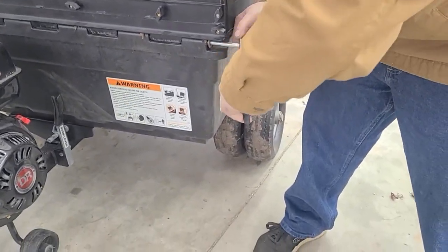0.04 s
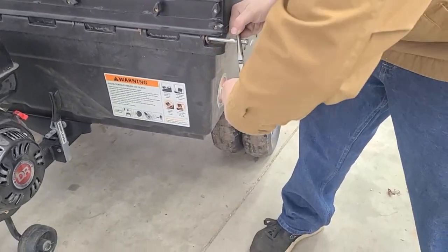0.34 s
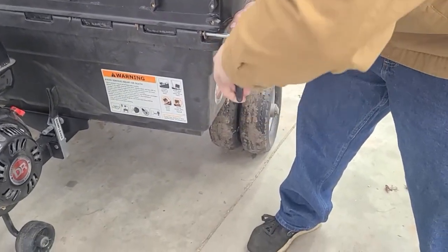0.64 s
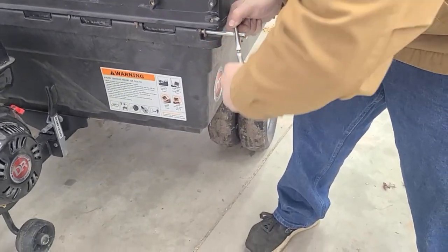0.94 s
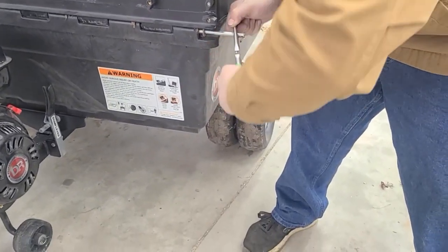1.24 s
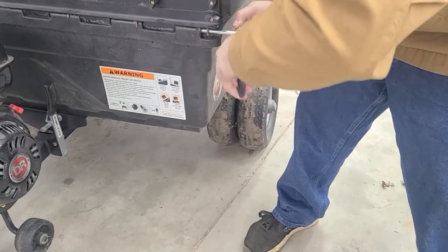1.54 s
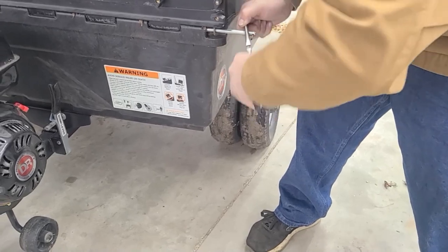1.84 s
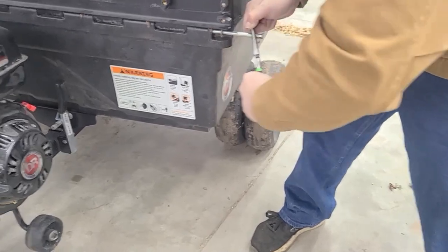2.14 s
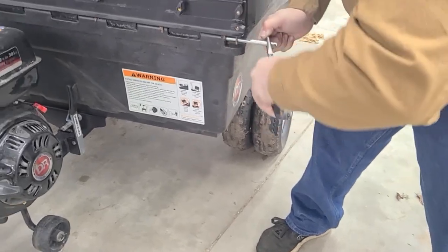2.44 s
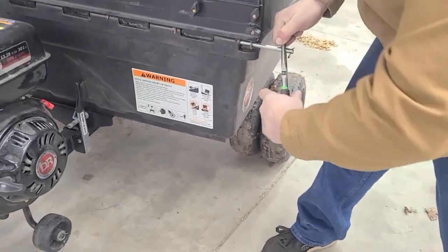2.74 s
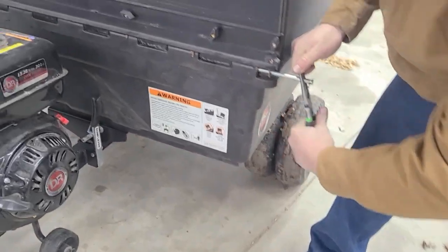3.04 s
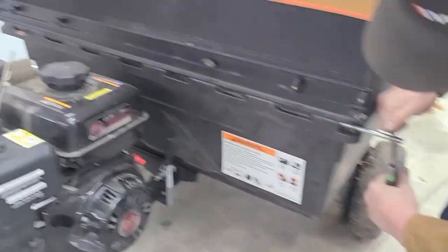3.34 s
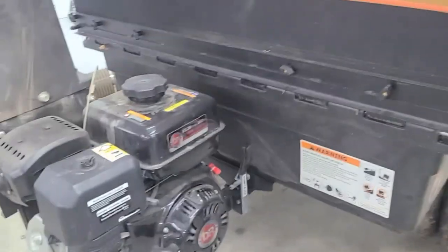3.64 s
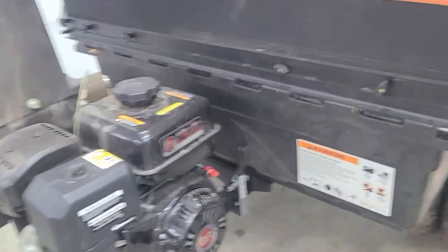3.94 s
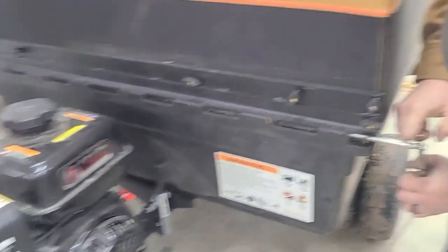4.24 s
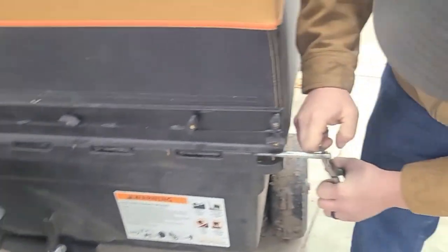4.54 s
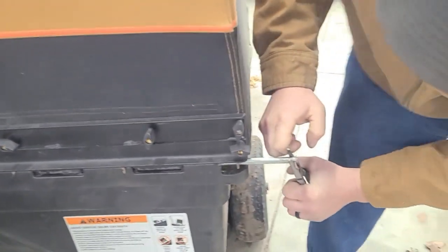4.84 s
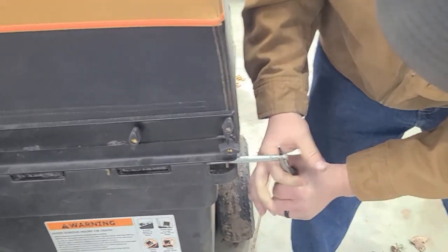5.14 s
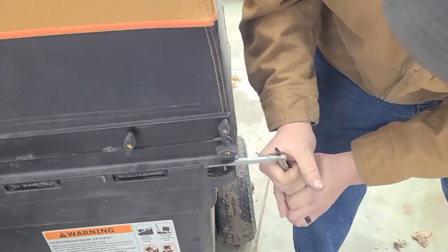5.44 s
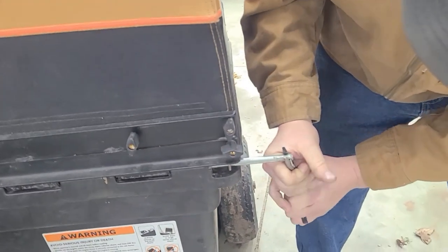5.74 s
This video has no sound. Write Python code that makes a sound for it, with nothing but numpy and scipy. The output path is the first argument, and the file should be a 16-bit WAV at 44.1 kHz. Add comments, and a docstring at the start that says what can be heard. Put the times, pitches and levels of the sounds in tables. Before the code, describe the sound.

Pliers twist a steel rod in a hinge with faint rubbing and ticks, then a booming clack, a knock and a bright metallic ring.

```python
"""A humming garage: pliers twist a steel rod to and fro through the hinge of a machine's hopper.
The rod rubs softly in the hinge and the jaws tick on it. It jerks forward with a clack and the hopper
wall booms; it knocks once more, then steel strikes steel and rings brightly.
Canvas sleeves swish as the hands change their grip."""
import sys
import numpy as np
from scipy import signal
from scipy.fft import rfft, irfft, next_fast_len
from scipy.io import wavfile
from scipy.ndimage import map_coordinates

SR = 44100
rng = np.random.default_rng(int(sys.argv[2]) if len(sys.argv) > 2 else 0)


def to_wav(sig):
    """Store sig (one row per channel, or 1-D mono) as 16-bit WAV at the path in sys.argv[1].

    Samples outside -1..1 are clipped; the rate is SR.
    """
    pcm = np.clip(np.atleast_2d(sig), -1, 1) * 32767
    pcm = np.round(pcm).astype(np.int16)
    wavfile.write(sys.argv[1], SR, pcm.T)  # frames by channels


N = 255474


def rubbing():
    """Each twist rubs into the hopper's many resonances; shoved lengthwise, the rod scrapes harder."""
    # twists of the rod: peak speed t/s, level/dB
    twists = [(0.299, -60.5), (.6, -53.5), (.84, -55.5), (1.058, -54.5), (1.281, -56), (1.499, -54.5),
              (1.7, -55), (1.915, -55.5), (2.134, -56), (2.349, -56.5), (2.59, -54)]
    # lengthwise shoves: peak speed t/s, level/dB, rise/s, fall/s, grit offset/dB
    shoves = [(2.744, -49, 0.043, .11, -1), (2.821, -35, 0.01, 0.019, -10), (3.229, -57, 0.022, 0.031, -29),
              (3.44, -38, .033, .014, -22.5), (3.505, -46, 0.045, .028, -9.5)]
    # friction spectra: f/Hz, level/dB
    rub_spectrum = [(180, -58), (300, -24), (326, -0.5), (461, -12), (756, -2), (1110, -5), (1200, -5),
                    (2170, -8.5), (3870, -19.5), (6570, -29), (15500, -39)]
    scrape_spectrum = [(240, -31), (400, -4), (1120, -3), (1470, 0), (2470, -9.5), (3210, -7.5), (3570, -9),
                       (5230, -23.5), (6680, -19.5), (8030, -28), (15500, -33)]
    grit_spectrum = [(1500, -11), (3000, 4.5), (4500, -2), (7000, -6.5), (9000, -14), (15000, -23)]
    turning = sum(amp(db) * stroke(s, rise_s=0.09, fall_s=0.055) for s, db in twists)
    twist = turning * amp(2 + wobble(56)) * noise(shape(rub_spectrum), grain_db=1, ripple_db=3.5)
    scrape_env, grit_env = np.zeros(N), amp(-11.5) * turning
    for s, db, rise_s, fall_s, grit_db in shoves:
        speed = stroke(s, rise_s, fall_s)
        scrape_env += amp(db) * speed
        grit_env += amp(db + grit_db) * speed
    scrape = scrape_env * noise(shape(scrape_spectrum), grain_db=2, ripple_db=6)
    grit = grit_env * noise(shape(grit_spectrum), grain_db=2)
    return twist * pan(2.8) + (scrape + grit) * amp(wobble(60)) * pan(0.83)


def plier_ticks():
    """The jaws shift on the rod: a bright snap with some body from the hinge."""
    # jaw slips: t/s, level/dB, body offset/dB
    slips = [(0.4742, -40, -6.5), (0.561, -42.5, 2.5), (0.6222, -38.5, 6), (0.7612, -42, 7),
             (0.8169, -45.5, -2), (1.1996, -44.5, -2), (1.272, -51, -9), (1.8248, -43, 2.5),
             (2.0416, -46, 1), (2.4836, -49, 0), (2.7041, -44, -10), (2.8316, -33, 10), (3.4356, -28, 4),
             (3.95, -60.5, 23), (4.645, -31, 3.5), (4.685, -41.5, 5), (4.7352, -45, 8.5)]
    snap_env, body_env = np.zeros((2, 1, N))
    for s, db, body_db in slips:
        add(snap_env, s, amp(db - 7.5) * blow(rise_s=0.00055, t60_s=0.049))
        add(body_env, s, amp(db + body_db - 8.5) * blow(rise_s=0.0016, t60_s=0.077))
    snap = noise(shape([(1500, -24), (4300, 0), (5700, -2.5), (6400, 1.5), (7200, -1.5),
                        (9000, -9), (15000, -12)]))
    body = noise(shape([(200, -27.5), (800, -3), (1600, 2), (3200, -4), (6000, -32), (15000, -36)]))
    return (snap_env * snap + body_env * body) * pan(3.6)


def rod_jolts():
    """The rod breaks loose and fetches up against the hinge with a dry clack."""
    # jolts: t/s, level/dB, rise/s, t60/s, resonance f/Hz, boost/dB, Q
    jolts = [(2.817, -27.5, 0.0033, 0.22, 1900, 5, 3.2), (2.829, -16.5, 0.0047, 0.091, 845, 2.5, 2),
             (3.434, -28.5, 0.0018, 0.035, 1300, -1.5, 2), (3.439, -25, 0.00047, 0.061, 1390, 24, 6.2),
             (3.455, -36.5, .002, 0.24, 380, 25, 3.3)]
    # hinge spectrum: f/Hz, level/dB
    hinge = [(120, -17), (200, -8.5), (315, -3.5), (422, -37.5), (525, 0), (677, -9.5), (1110, 1),
             (1260, -5.5), (2130, -8), (2420, -20.5), (3750, -15.5), (4030, -19.5), (6350, -28.5),
             (8500, -40), (15500, -52.5)]
    out = np.zeros((2, N))
    for s, db, rise_s, t60_s, clack_hz, boost_db, q in jolts:
        clack = noise(lambda hz: along(hinge, hz) + boost_db * hump(hz, clack_hz, q), SR)
        add(out, s, amp(db) * blow(rise_s, t60_s) * clack)
    return out * pan(1.46)


def hopper():
    """The hopper wall booms after a jolt and thuds when leaned on."""
    # wall modes, the strongest two beating: f/Hz, level/dB, t60/s
    wall_modes = [(242, -16.5, 0.61), (278.5, -6, 0.62), (286.9, 4.5, 0.31), (575, -6.5, 0.12),
                  (584, -27, 1), (847, -4.5, 0.11), (1050, -43, 1), (1117, -8, 0.082), (1260, -41, 0.43),
                  (1535, -28, 0.21), (1790, -32, 0.79), (2230, -39, 0.79)]
    # pushes on the wall: t/s, level/dB, rise/s
    pushes = [(2.82, -28.5, 0.015), (2.85, -20.5, 0.011)]
    # dull bumps of hands and body: t/s, level/dB, f/Hz, t60/s
    bumps = [(0.05, -46.5, 170, 0.58), (1.29, -51, 350, 0.39), (2.12, -49.5, 140, 0.29),
             (2.674, -35.5, 80.5, 0.24), (3.449, -38.5, 193, 0.19), (3.551, -44, 176, 0.23),
             (4.653, -39.5, 227, 0.15), (4.678, -43, 360, 0.3), (5.079, -36.5, 174, 0.19)]
    out = np.zeros((2, N))
    for s, db, rise_s in pushes:
        for hz, mode_db, t60_s in wall_modes:
            boom = mode(hz, t60_s, rise_s, scatter=0.27, build_s=0.036, flutter_hz=16)
            add(out, s, amp(db + mode_db) * boom)
    for s, db, centre_hz, t60_s in bumps:
        thud = noise(lambda hz: 40 * np.log10(hump(hz, centre_hz, q=2.2)), SR)
        add(out, s, amp(db) * blow(0.0068, t60_s) * thud)
    return out * pan(0.25)


def steel_ring():
    """Steel strikes steel and rebounds; the close pair of modes near 7 kHz beats."""
    # steel modes: f/Hz, level/dB, t60/s, rise/s, left-right level/dB, left-right phase/rad
    steel_modes = [(1400, -44, .45, .003, -1, .4), (2729, -47, .4, .002, 0, .6),
                   (3892, -23.5, .74, .018, 0, .9), (4646, -41, .42, .002, 0, 1),
                   (5679, -48, .4, .002, 0, 1), (6228, -49, .6, .002, 0, 1),
                   (6955, -17.5, .22, .002, 7, 1.2), (7064, -15, .56, .002, 7, 1.2),
                   (9001, -45, .3, .002, 0, 1.5), (9324, -47, .45, .002, 0, 1.5),
                   (9636, -30, .33, .002, -3, 1.6), (10343, -21.5, .38, .003, 0, 1.8),
                   (11060, -33, .38, .003, 0, 1.8), (12370, -26, .28, .004, -3, 1.2),
                   (13743, -36, .34, .002, 2, 1.4), (14184, -34, .35, .002, 2, 1.4),
                   (14470, -32, .42, .002, 2, 1.2)]
    # cracks of strike and rebound: t/s, level/dB
    clinks = [(4.0795, -22), (4.1077, -28.5)]
    out = np.zeros((2, N))
    strike_s = clinks[0][0]
    for k, (hz, db, t60_s, rise_s, side_db, phase_rad) in enumerate(steel_modes):
        ring = mode(hz, t60_s, rise_s, scatter=0.3, build_s=0.03, flutter_hz=45, phase_rad=phase_rad)
        tilt_db = 0.3 * np.log2(hz / 7000)  # a hard strike favours the upper modes
        polarity = (-1) ** k
        add(out, strike_s, polarity * amp(db + tilt_db) * pan(side_db) * ring)
    out *= standing_waves(strike_s)
    colour = shape([(400, -9.5), (1500, -4), (4000, 1.5), (5500, -1), (7000, 2),
                    (10000, -7.5), (15000, -2)])
    tick_env = amp(4.5) * blow(rise_s=0.00018, t60_s=0.015)
    wash_env = amp(-13) * blow(rise_s=0.0036, t60_s=0.46)
    for s, db in clinks:
        add(out, s, amp(db) * (tick_env + wash_env) * noise(colour, SR, ripple_db=2.5))
    return out


def standing_waves(strike_s):
    """Gain of the ring as the listener moves through it: a growing reflection drifts in and out of step."""
    node_s, node_rate_hz, depth = 4.284, 8.4, 0.8
    build_s, build_db = 0.26, 4.5
    t = np.arange(N) / SR
    built = 1 - np.exp(-np.maximum(t - strike_s, 0) / build_s)
    reflection = depth * built * np.exp(2j * np.pi * node_rate_hz * (t - node_s))
    return amp(build_db * built) * np.abs(1 - reflection)


def sleeves():
    """Canvas brushes on canvas; the fastest part of a swish adds fizz."""
    # swishes: peak speed t/s, level/dB, rise/s, fall/s, fizz offset/dB
    swishes = [(4.454, -49.5, 0.058, 0.031, -7.5), (4.528, -45, 0.06, 0.055, 0),
               (4.68, -57, 0.087, 0.082, -10), (4.847, -42.5, 0.078, 0.032, -10.5),
               (5.42, -75, 0.39, .18, -1.5)]
    # cloth spectra: f/Hz, level/dB
    canvas_spectrum = [(200, -15), (700, -8), (1500, -3), (2200, 0), (3100, 0), (4600, -9.5), (7000, -15.5),
                       (9000, -19.5), (15000, -27.5)]
    fizz_spectrum = [(1800, -10), (3200, 7), (4000, 4.5), (5000, -4), (6900, 2.5), (8500, -9.5),
                     (12500, -3.5), (15500, -8)]
    swish_env, fizz_env = np.zeros((2, N))
    for s, db, rise_s, fall_s, fizz_db in swishes:
        speed = stroke(s, rise_s, fall_s)
        swish_env += amp(db) * speed
        fizz_env += amp(db + fizz_db + 3.5) * speed ** 1.4
    swish = swish_env * noise(shape(canvas_spectrum), grain_db=1, ripple_db=2.5)
    fizz = fizz_env * noise(shape(fizz_spectrum))
    return (swish + fizz) * amp(2.5 + wobble(70)) * pan(0.81)


def garage_echo(x, predelay_s=0.006):
    """Hard walls reflect the sound, the treble dying first."""
    # room decay: f/Hz, t60/s
    decay = [(150, .5), (1000, 0.8), (3500, 0.75), (8000, 0.42), (15000, 0.038)]
    hz, t, spectra = signal.stft(noise(np.zeros_like, SR), SR, nperseg=256)
    fade = np.exp(-np.log(1000) * t / along(decay, hz)[:, None])
    tail = signal.istft(spectra * fade, SR, nperseg=256)[1]
    delayed = np.pad(x.mean(axis=0), (round(predelay_s * SR), 0))
    return signal.fftconvolve(delayed[None], tail / np.linalg.norm(tail[0]), axes=1)[:, :N]


def background():
    """A wavering machine hum over the garage's low rumble and faint hiss."""
    # hum tones: f/Hz, level/dB
    tones = [(60, -49.5), (119, -56), (328, -66.5)]
    # room noise spectrum: f/Hz, level/dB
    air = [(22, -24), (40, -12), (70, -3.5), (110, -5.5), (160, -16), (230, -15), (330, -17.5), (500, -21),
           (800, -25), (1200, -27.5), (2400, -34), (4500, -39.5), (7000, -39), (8600, -48.5), (15800, -49)]
    t = np.arange(N) / SR
    hum = sum(amp(db + 2.5 * wobble(5)) * np.sin(2 * np.pi * hz * t + 0.45 * wobble(4))
              for hz, db in tones)
    rumble = amp(-53.5) * noise(lambda hz: 40 * np.log10(hump(hz, centre_hz=61.8, q=4.6)))
    return (hum + rumble) * pan(-0.77) + amp(-53) * noise(shape(air))


def mode(hz, t60_s, rise_s, scatter, build_s, flutter_hz, phase_rad=0):
    """A ringing mode; as reflections build up, it wavers differently left and right."""
    t = np.arange(SR) / SR
    knots = rng.standard_normal((2, 64)) + 1j * rng.standard_normal((2, 64))
    curves = signal.resample(knots, 512, axis=1)
    echoes = np.array([np.interp(t * flutter_hz, np.arange(512) / 8, curve) for curve in curves])
    share = scatter * (1 - np.exp(-t / build_s))
    direct = np.exp(0.5j * phase_rad * np.array([[1], [-1]]))
    field = (direct + share * echoes) / np.sqrt(1 + 2 * share ** 2)
    return blow(rise_s, t60_s) * np.imag(field * np.exp(2j * np.pi * hz * t))


def noise(colour, size=N, grain_db=0, ripple_db=0):
    """Stereo noise, rms 1, colour(Hz) in dB; grain makes tiny catches, ripple many close resonances."""
    # left-right likeness: f/Hz, correlation
    likeness = [(60, 0.98), (250, 0.87), (500, 0.32), (1000, 0.19), (3000, 0.073), (12000, .15)]
    catches = rng.standard_normal((2, size)) * amp(grain_db * wobble(700, size))
    peaks = signal.resample(rng.standard_normal(512), 4096)

    def mid_side_gains(hz):
        ripple = np.tanh(np.interp(hz, np.linspace(0, SR / 2, len(peaks)), peaks))
        width_rad = np.arccos(np.clip(along(likeness, hz), -1, 1)) / 2
        return amp(colour(hz) + ripple_db * ripple) * [np.cos(width_rad), np.sin(width_rad)]

    mid, side = filtered(catches, mid_side_gains)
    stereo = np.array([mid + side, mid - side])
    return stereo / np.sqrt(np.mean(stereo ** 2) + 1e-20)


def stroke(peak_s, rise_s, fall_s):
    """Envelope of a rubbing movement that speeds up until peak_s, then slows."""
    roundness = 2.7  # 1 pointed, 2 a bell, more is flat-topped
    t = np.arange(N) / SR - peak_s
    return np.exp(-np.abs(t / np.where(t < 0, rise_s, fall_s)) ** roundness)


def blow(rise_s, t60_s):
    """Impact envelope, 1 s long."""
    t = np.arange(SR) / SR
    return (1 - np.exp(-t / rise_s)) * np.exp(-np.log(1000) * t / t60_s)


def wobble(rate_hz, size=N):
    """Smooth random curve."""
    knots = rng.standard_normal(int(size * rate_hz / SR) + 4)
    return map_coordinates(knots, [np.arange(size) * rate_hz / SR])


def amp(db):
    """Decibels to gain."""
    return 10 ** (np.asarray(db) / 20)


def pan(db):
    """Channel gains for a left-right difference."""
    return amp([[db / 2], [-db / 2]])


def along(points, hz):
    """Interpolate (f/Hz, value) points on a log axis."""
    f, values = np.transpose(points)
    return np.interp(np.log(hz + 1), np.log(f), values)


def shape(points):
    """Noise colour from (f/Hz, level/dB) points."""
    return lambda hz: along(points, hz)


def hump(hz, centre_hz, q):
    """Magnitude of one resonance, peak 1."""
    return 1 / np.hypot(1, q * ((hz + 1) / centre_hz - centre_hz / (hz + 1)))


def filtered(x, response):
    """Apply the gain response(Hz)."""
    size = x.shape[-1]
    padded = next_fast_len(size + SR // 4)
    hz = np.fft.rfftfreq(padded, 1 / SR)
    return irfft(rfft(x, padded) * response(hz), padded)[..., :size]


def left_first(x, delay_s):
    """An off-centre source reaches the left side sooner."""
    return filtered(x, lambda hz: np.exp(1j * np.pi * hz * delay_s * np.array([[1], [-1]])))


def add(track, start_s, sound):
    """Mix a sound into a track."""
    start = max(round(start_s * SR), 0)
    track[:, start:start + sound.shape[-1]] += sound[..., :N - start]


def scene():
    """All sources; ticks, clacks and friction feed the room echo."""
    ticks, clacks = plier_ticks(), rod_jolts()
    friction = left_first(rubbing(), delay_s=0.00014) + sleeves()
    echo = garage_echo(amp(-8) * ticks + amp(-11.5) * clacks + amp(-11) * friction)
    return ticks + clacks + friction + echo + hopper() + steel_ring() + background()


def record(dry):
    """Brick-wall low-pass."""
    return filtered(dry, lambda hz: hz < 15850)


dry = scene()
out = record(dry)
to_wav(out)
```